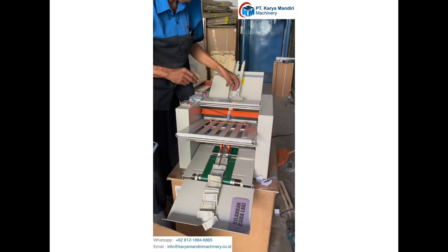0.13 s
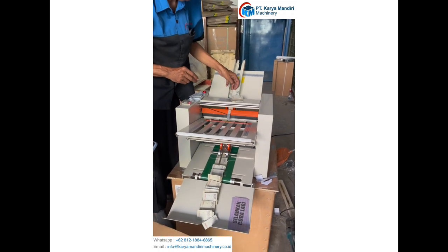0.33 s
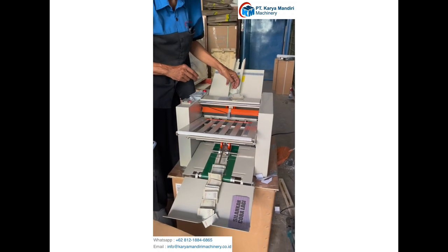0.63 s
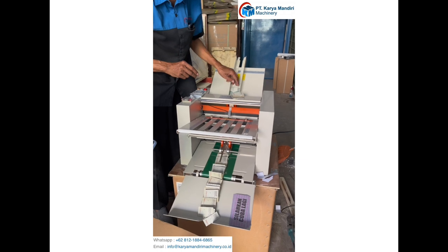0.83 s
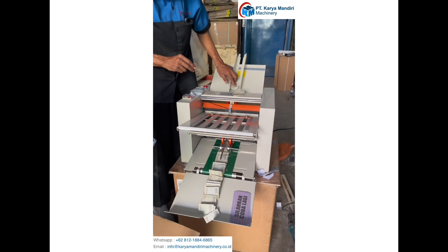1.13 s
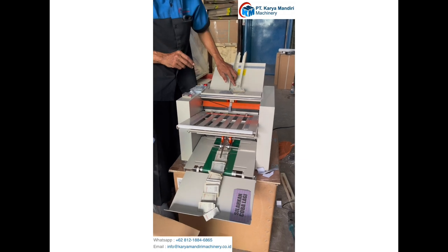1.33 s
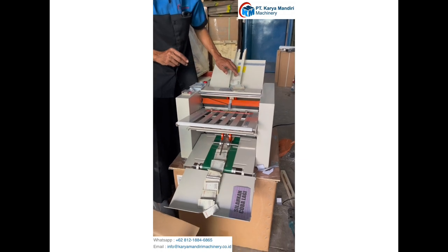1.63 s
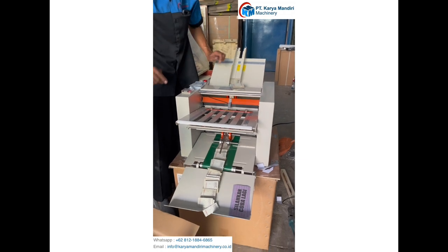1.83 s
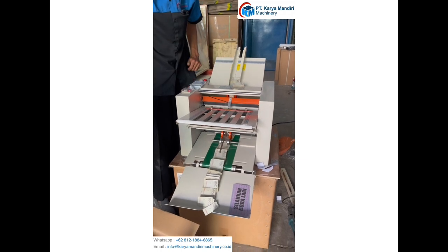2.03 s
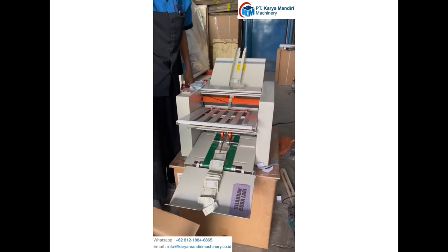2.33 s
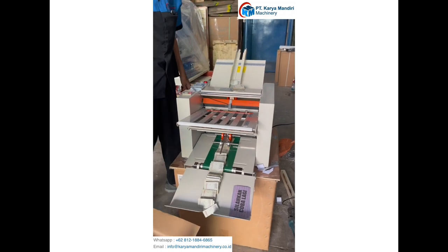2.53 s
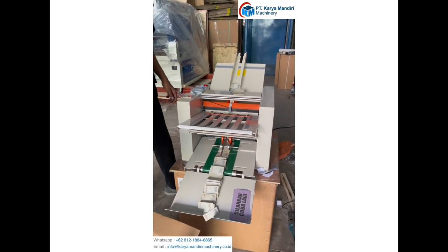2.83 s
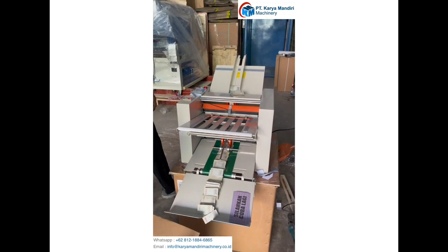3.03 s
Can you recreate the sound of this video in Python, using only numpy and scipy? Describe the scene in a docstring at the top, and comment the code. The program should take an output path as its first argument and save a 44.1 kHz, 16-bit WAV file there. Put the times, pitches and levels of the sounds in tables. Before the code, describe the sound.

Running paper folder droning and swishing while several sheets feed through with crisp clicks and snaps.

```python
"""Tabletop paper folding machine

Rollers turn ten times a second in a workshop: the housing drones, and once a turn the motor hum
throbs and a belt swishes. Five sheets go through: each is grabbed with a tick, crackles between the
rollers, buckles into its fold with a snap and swishes out, most with a soft thump of the frame."""
import sys
import numpy as np
from scipy import signal
from scipy.fft import rfft, irfft
from scipy.io import wavfile

SR = 44100
rng = np.random.default_rng(int(sys.argv[2]) if len(sys.argv) > 2 else 0)


def persist_wave(psi):
    """Save psi, clipped to +-1, as 16-bit WAV."""
    counts = np.round(np.clip(psi, -1, 1) * 32767).astype(np.int16)
    wavfile.write(sys.argv[1], SR, np.atleast_2d(counts).T)


N = 139797
T = np.arange(N) / SR
HZ = np.fft.rfftfreq(N, 1 / SR)


def from_db(db):
    """Decibels to gain."""
    return 10 ** (np.asarray(db) / 20)


def unit_rms(x):
    """Scale to unit power."""
    return x / np.sqrt(np.mean(x ** 2) + 1e-20)


def over_hz(points):
    """Table interpolated on a log-frequency axis."""
    hz, value = np.transpose(points)
    return np.interp(np.log(HZ + 1), np.log(hz), value)


def colour(points):
    """Gain of a spectrum table, rolled off beyond its ends."""
    low_cut = 1 + (points[0][0] / (HZ + 1) / 1.4) ** 4
    high_cut = 1 + (HZ / points[-1][0] / 1.4) ** 4
    return from_db(over_hz(points)) / low_cut / high_cut


def resonance(hz, width_hz):
    """Gain of a resonance, halved at hz +/- width_hz."""
    return 1 / (1 + ((HZ - hz) / width_hz) ** 2)


def drift(rate_hz):
    """Low-passed random wander, unit RMS."""
    return unit_rms(irfft(rfft(rng.standard_normal(N)) / (1 + (HZ / rate_hz) ** 2), N))


def swell(at_s, rise_s, fall_s, hold_s=0):
    """Envelope: exponential rise up to at_s, hold, decay."""
    return np.exp(np.minimum(T - at_s, 0) / rise_s - np.maximum(T - at_s - hold_s, 0) / fall_s)


# Left-right likeness: f/Hz, coherence/0-1
COHERENCE = [(130, .995), (290, .975), (480, .7), (750, .65), (1050, .3), (1500, .8), (2300, .8),
             (3200, .25), (4400, .4), (5500, .7), (8000, .7), (9200, .98), (10700, .85), (12000, .98)]


def stereo_noise(gain, grainy=False, grains_per_s=6000, spread_db=2.0):
    """Smooth or grainy shaped noise, partly coherent between channels, unit RMS."""
    white = rng.standard_normal((2, N))
    if grainy:
        white *= rng.random(N) < grains_per_s / SR
        white *= from_db(spread_db * np.minimum(rng.exponential(1, N), 4))
    alike = np.clip(over_hz(COHERENCE), 0, 1)
    mid, side = irfft(rfft(white) * gain * np.sqrt([1 + alike, 1 - alike]), N)
    return unit_rms(np.array([mid + side, mid - side]))


def room(x, t60_s=0.64):
    """Diffuse workshop tail, one per channel."""
    t = T[:SR // 2]
    tail = rng.standard_normal((2, len(t))) * from_db(-60 * t / t60_s) * (t > .004)
    return signal.fftconvolve(x, tail / np.sqrt(np.sum(tail ** 2) / 2), axes=1)[:, :N]


# Roller speed, sagging while sheets pass: t/s, rate/(turns/s)
ROLLER_SPEED = [(0, 10.18), (.8, 10.18), (1.6, 10.0), (2.4, 10.08), (3.1, 10.14)]


def turns():
    """Roller angle in turns, whole at the start of each belt rub."""
    return np.cumsum(np.interp(T, *np.transpose(ROLLER_SPEED))) / SR - .87


def order_tone(multiple):
    """Wavering tone locked to a multiple of the roller rate."""
    level = 1 + .12 * drift(2.5)
    phase = 2 * np.pi * (multiple * turns() + rng.random()) + .3 * drift(2)
    return level * np.sqrt(2) * np.sin(phase)


# Drive tones: multiple of roller rate, level/dB
ROLLER_ORDERS = [(7, -39.5), (8, -39), (10, -45), (13, -40.5), (15, -53), (20, -41.5), (22, -38.5),
                 (25, -39), (27, -36), (28, -38.5), (28.5, -41), (29, -39.5), (31, -43), (49.8, -43)]


def motor(hum_db=-32, throb_db=2.5, lead_turns=0.25):
    """Roller orders and a motor hum that throbs once a turn and weakens mid-run."""
    load = np.cos(2 * np.pi * (turns() + lead_turns))
    throb = unit_rms(from_db(throb_db * load))
    fade_db = -6.5 * np.exp(-((T - 1.55) / 0.9) ** 2)
    hum = from_db(hum_db + fade_db) * throb * order_tone(25.55)
    return hum + sum(from_db(db) * order_tone(multiple) for multiple, db in ROLLER_ORDERS)


# Housing resonances: f/Hz, half-width/Hz, level/dB
HOUSING_MODES = [(200, 12, -44), (218.2, 9.6, -44), (262.4, 7.5, -37), (271, 19.6, -35), (354, 9.1, -46.5),
                 (430.6, 26, -44), (443, 23, -45.5), (505, 30, -44.5), (684.7, 12.4, -44.5)]
# Gear whine: f/Hz, level/dB
GEAR_WHINE = [(839, -56.5), (1615, -54), (3580, -56), (4070, -69), (5620, -60)]
# Rumble spectrum: f/Hz, relative level/dB
RUMBLE_SPECTRUM = [(36, -33), (50, -6.5), (80, -9), (145, -7), (200, -11), (320, -14.5), (600, -18),
                   (1000, -30.5)]


def housing(rumble_db=-32):
    """Shaken by the drive, the housing rings and rumbles; the gears whine faintly."""
    modes = sum(from_db(db) * stereo_noise(resonance(hz, width)) for hz, width, db in HOUSING_MODES)
    whine = sum(from_db(db) * stereo_noise(resonance(hz, width_hz=7.6)) for hz, db in GEAR_WHINE)
    return modes + whine + from_db(rumble_db) * stereo_noise(colour(RUMBLE_SPECTRUM))


# Belt rub spectrum: f/Hz, relative level/dB
BELT_SPECTRUM = [(500, 14.5), (1400, 12), (4200, 6.5), (8000, -6), (10700, 11.5), (11500, 2), (12500, -18),
                 (13500, -44)]


def belt(level_db=-36, rise_turns=0.019, length_turns=0.47):
    """The belt rubs once a turn with a grainy swish."""
    phase = turns() % 1
    rub = (1 - np.exp(-phase / rise_turns)) * np.exp(-(phase / length_turns) ** 4)
    return from_db(level_db + drift(2.1)) * rub * stereo_noise(colour(BELT_SPECTRUM), grainy=True)


# Running noise spectrum: f/Hz, relative level/dB
WHIR_SPECTRUM = [(400, -35), (730, 3.5), (1100, -1.5), (1550, -1.5), (1900, -5.5), (3300, -6.5),
                 (4500, -10), (8500, -17), (10700, -7), (12200, -25), (13500, -58)]


def rollers(level_db=-38):
    """Even whir of the running rollers."""
    return from_db(level_db + drift(28)) * stereo_noise(colour(WHIR_SPECTRUM))


# Frame thumps: t/s, level/dB
FRAME_THUMPS = [(1.0, -51), (1.735, -27), (2.18, -25.5), (2.80, -25)]


def thumps():
    """The frame booms softly as a folded sheet squeezes through."""
    push = sum(from_db(db) * swell(s, rise_s=0.079, fall_s=0.046) for s, db in FRAME_THUMPS)
    return push * stereo_noise(resonance(hz=84.6, width_hz=17))


def pops(per_s=150, spread_db=3, width_hz=330):
    """Sparse creases give way, each ringing briefly at one of eight pitches; unit RMS."""
    pitches_hz = np.geomspace(1900, 7000, 8)
    shape = (len(pitches_hz), N)
    hits = rng.random(shape) < per_s / len(pitches_hz) / SR
    kicks = hits * from_db(spread_db * rng.uniform(-2, 2, shape))
    spectrum = sum(rfft(k) * resonance(hz, width_hz) / np.sqrt(hz) for k, hz in zip(kicks, pitches_hz))
    return unit_rms(irfft(spectrum, N))


# Sheets between the rollers: grab t/s, fold t/s, level/dB
SHEET_FEEDS = [(0.871, 0.978, -34.5), (1.223, 1.318, -34), (1.597, 1.74, -36.5), (1.982, 2.102, -33.5),
               (2.608, 2.747, -36)]
# Paper crackle spectrum: f/Hz, relative level/dB
CRACKLE_SPECTRUM = [(400, 7), (1000, -14.5), (1700, -14), (2250, 4.5), (3200, -5.5), (5000, -1.5),
                    (8000, -10.5), (10700, -7), (12000, -9), (14000, -53)]


def crackle(waver_db=1.2, pop_db=-5.5):
    """Each sheet rustles and pops between the rollers until just after its fold."""
    feed = sum(from_db(db) * swell(grab, rise_s=.003, fall_s=.06, hold_s=fold - grab + .06)
               for grab, fold, db in SHEET_FEEDS)
    rustle = from_db(waver_db * drift(75)) * stereo_noise(colour(CRACKLE_SPECTRUM), grainy=True)
    return feed * (rustle + from_db(pop_db) * pops())


def scrape(relative_db=-11):
    """A grabbed sheet sticks and slips on the feed roller."""
    grip = sum(from_db(db + relative_db) * swell(grab, rise_s=.003, fall_s=.03, hold_s=.05)
               for grab, _, db in SHEET_FEEDS)
    return grip * stereo_noise(resonance(hz=2230, width_hz=230), grainy=True)


# Exit slides: t/s, level/dB, decay/s
EXIT_SLIDES = [(1.017, -32, 0.14), (1.275, -24, 0.019), (1.344, -39, 0.12), (1.689, -26, 0.077),
               (1.747, -21.5, 0.029), (2.124, -24.5, 0.024), (2.151, -30, 0.034), (2.77, -25.5, 0.024),
               (2.785, -24, 0.018)]
# Sliding paper spectrum: f/Hz, relative level/dB
SLIDE_SPECTRUM = [(400, 13), (1000, 12.5), (2200, 12.5), (6000, 10.5), (9500, 9), (10900, 19), (12000, -13),
                  (13500, -70)]


def slides(rise_s=0.0036, waver_db=0.5):
    """Folded sheets slide out with a grainy swish."""
    envelope = sum(from_db(db) * swell(s, rise_s, decay_s) for s, db, decay_s in EXIT_SLIDES)
    return envelope * from_db(waver_db * drift(90)) * stereo_noise(colour(SLIDE_SPECTRUM), grainy=True)


# Edge clicks: t/s, level/dB
EDGE_CLICKS = [(0.8714, -22), (0.9859, -13.5), (1.196, -13.5), (1.744, -16), (1.9785, -22), (1.984, -23),
               (2.0888, -17), (2.61, -19.5), (2.6202, -29)]
# Click spectrum: f/Hz, relative level/dB
CLICK_SPECTRUM = [(300, -7), (1700, 4), (3500, 4.5), (5700, 10), (9500, -1.5), (11000, 8.5), (12500, -5),
                  (15500, -31)]


def clicks(rise_s=0.00016, fall_s=0.0032, hold_s=0.0003):
    """The sheet's edge clicks crisply against rollers and guides."""
    envelope = sum(from_db(db) * swell(s, rise_s, fall_s, hold_s) for s, db in EDGE_CLICKS)
    return envelope * stereo_noise(colour(CLICK_SPECTRUM))


# Crease ticks: t/s, level/dB, f/Hz
CREASE_TICKS = [(0.9026, -19.5, 2230), (1.0168, -25, 4340), (1.1045, -23, 3300), (1.2331, -17.5, 2040),
                (1.3411, -26, 3220), (1.614, -22.5, 2120), (1.6811, -23, 3030), (1.7316, -13.5, 3000),
                (2.0216, -19, 3760), (2.035, -19, 2370), (2.1322, -19, 2670), (2.655, -26.5, 4900),
                (2.7438, -18, 2360)]


def ticks(rise_s=0.00014, fall_s=0.0018, hold_s=0.00024):
    """Creases tick between the rollers: duller bursts of band noise."""
    return sum(from_db(db) * swell(s, rise_s, fall_s, hold_s) * stereo_noise(resonance(hz, 0.26 * hz))
               for s, db, hz in CREASE_TICKS)


# Fold plate knocks: t/s, level/dB
PLATE_KNOCKS = [(0.9861, -19), (1.7451, -23)]


def knocks(hz=190, decay_s=0.0021):
    """A sheet knocks on the fold plate: one heavily damped low mode."""
    out = 0
    for s, db in PLATE_KNOCKS:
        age = np.maximum(T - s, 0)
        out -= 2 * from_db(db) * np.sin(2 * np.pi * hz * age) * np.exp(-age / decay_s)
    return out


# Buckling sheets: t/s, crack level/dB, main mode f/Hz, main mode level/dB, lower mode level/dB
BUCKLES = [(0.9875, -25, 2750, -24, -38), (1.3098, -14.5, 2660, -10, -40), (1.6987, -10.5, 2400, -4.5, -16),
           (2.0931, -14.5, 2570, -5.5, -16.5), (2.7312, -13, 2470, -2.5, -13)]
# Crack spectrum: f/Hz, relative level/dB
CRACK_SPECTRUM = [(400, -24), (1000, -10), (1800, -15), (2700, 6), (4200, -13), (4900, -5), (5700, -8),
                  (9000, -24), (10800, -3.5), (12000, -58), (15000, -55)]


def folds(crack_s=.0072, ring_s=.0012, glide_s=.0012, lower_hz=1460, upper_hz=4120, upper_db=-15.5):
    """Each buckling sheet cracks and rings briefly, its main mode falling as it slackens."""
    crack, ring = 0, 0
    flutter_rad = .3 * drift(240)
    for s, crack_db, main_hz, main_db, lower_db in BUCKLES:
        age = np.maximum(T - s, 0)
        crack += from_db(crack_db) * (age > 0) * np.exp(-(age / crack_s) ** 2)
        lead_s = .3 * glide_s * (1 - np.exp(-age / glide_s))  # starts 30% sharp
        main = from_db(main_db) * np.sin(2 * np.pi * main_hz * (age + lead_s) + flutter_rad)
        lower = from_db(lower_db) * np.sin(2 * np.pi * lower_hz * age + flutter_rad)
        upper = from_db(upper_db) * np.sin(2 * np.pi * upper_hz * age + flutter_rad)
        ring += 2 * age / ring_s * np.exp(-age / ring_s) * (main + lower + upper)
    return crack * stereo_noise(colour(CRACK_SPECTRUM)) + ring


def scene(dip_db=-7, room_db=-17):
    """The running machine, whose level dips briefly, and the sheets with a little room."""
    sheets = crackle() + scrape() + slides() + clicks() + ticks() + knocks() + folds()
    machine = motor() + housing() + belt() + rollers()
    dip = from_db(dip_db * np.exp(-((T - 1.383) / 0.097) ** 4))
    return dip * machine + thumps() + sheets + from_db(room_db) * room(sheets)


# Left minus right: f/Hz, level/dB
MIC_BALANCE = [(130, 0), (280, 1), (500, -2), (900, -5), (1500, -3), (2000, -1.5), (2700, -3.3), (4300, -3),
               (5800, 0)]
# Right microphone lag: f/Hz, phase/rad
MIC_LAG = [(0, 0), (300, 0), (650, -1.1), (1400, .4), (2800, 0), (4200, 1), (5000, 4), (6000, 6.2),
           (9250, 9.42), (11000, 11.2), (11700, 12.5), (22050, 12.5)]


def record(dry, cutoff_hz=15500):
    """Two microphone ports differ in level and phase; peaks are rounded and the top is cut."""
    tilt = from_db(over_hz(MIC_BALANCE) / 2)
    lag = np.exp(-1j * np.interp(HZ, *np.transpose(MIC_LAG)))
    heard = irfft(rfft(dry) * np.array([tilt, lag / tilt]), N)
    lowpass = signal.cheby2(12, 60, cutoff_hz, fs=SR, output="sos")
    return signal.sosfilt(lowpass, np.tanh(heard))


dry = scene()
out = record(dry)
persist_wave(out)
```